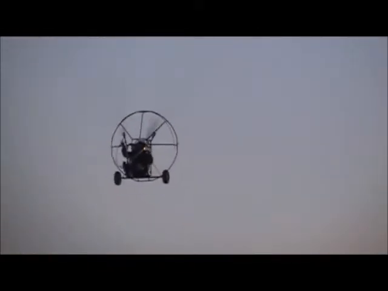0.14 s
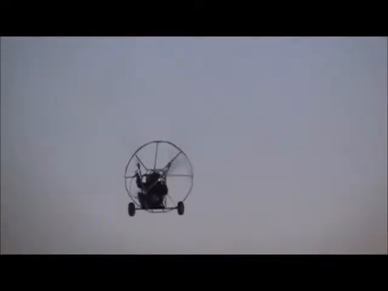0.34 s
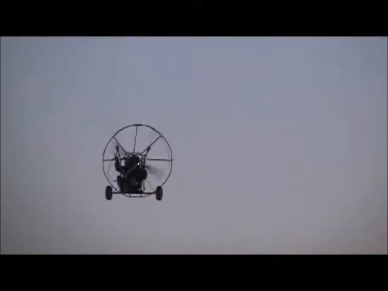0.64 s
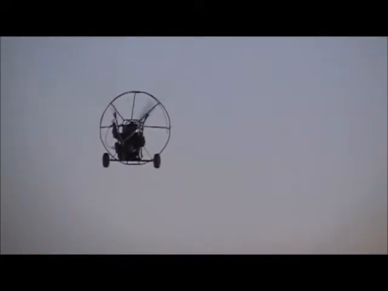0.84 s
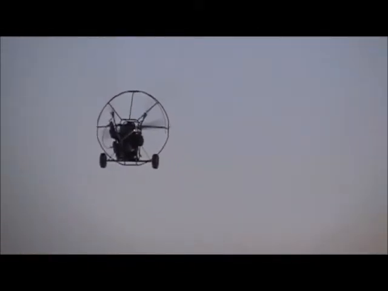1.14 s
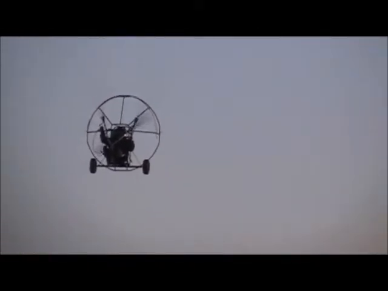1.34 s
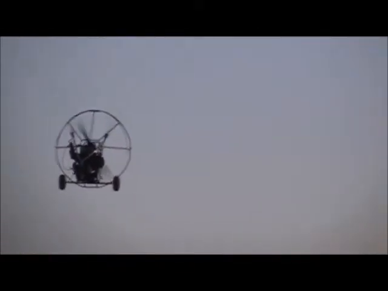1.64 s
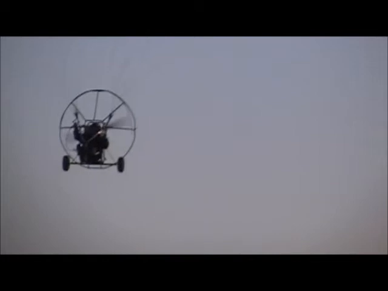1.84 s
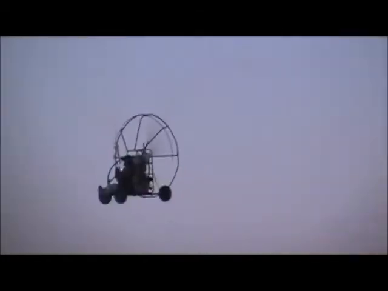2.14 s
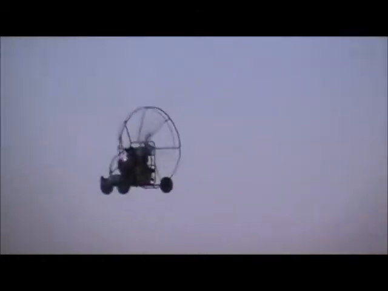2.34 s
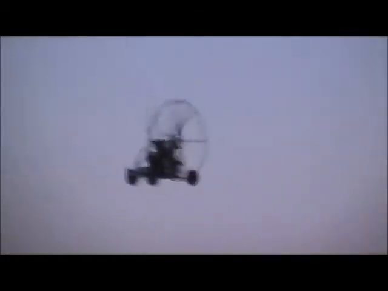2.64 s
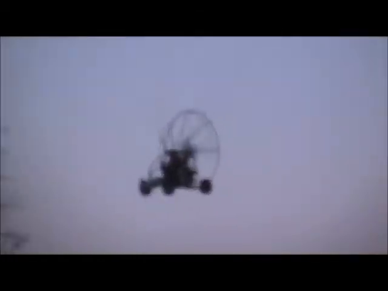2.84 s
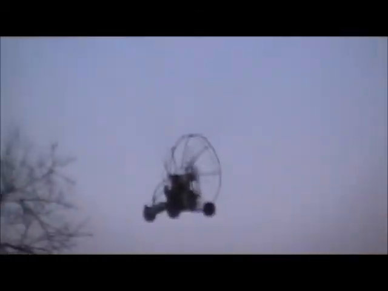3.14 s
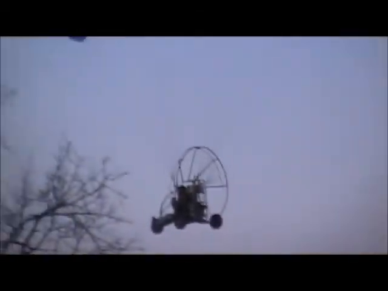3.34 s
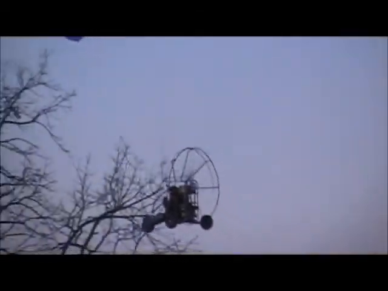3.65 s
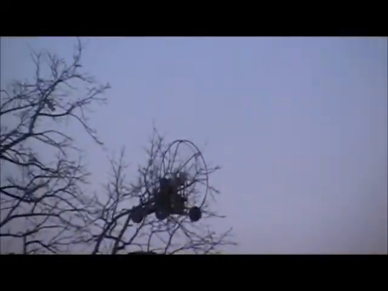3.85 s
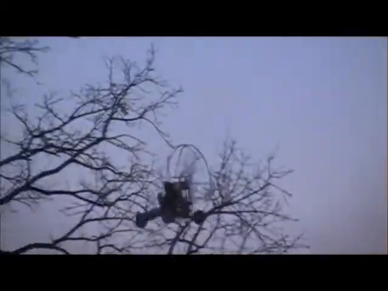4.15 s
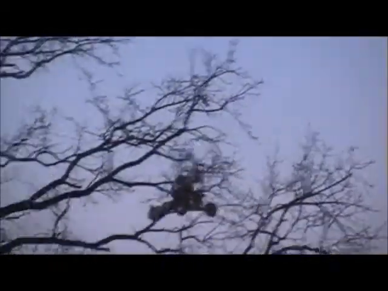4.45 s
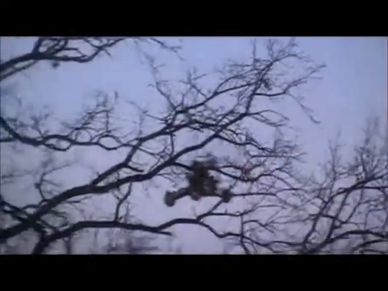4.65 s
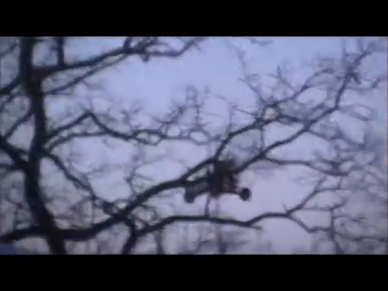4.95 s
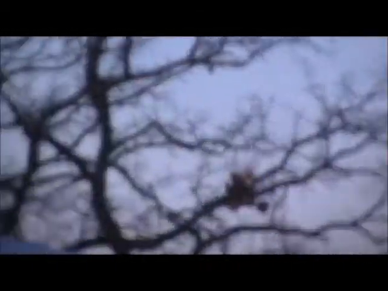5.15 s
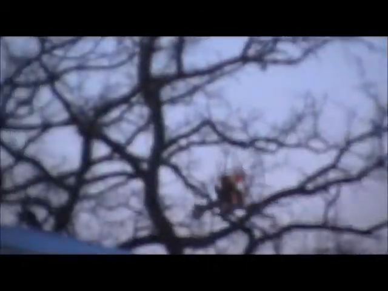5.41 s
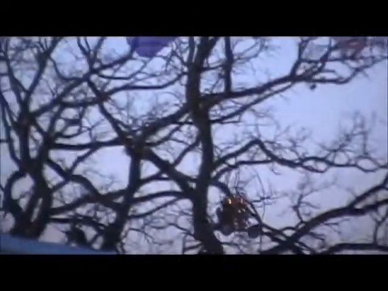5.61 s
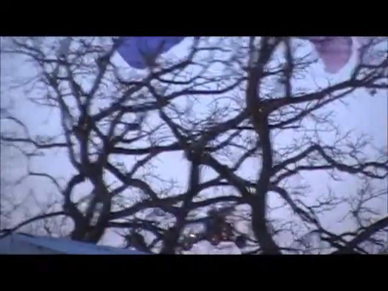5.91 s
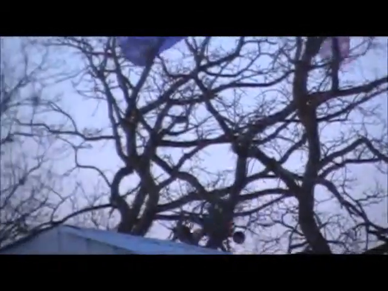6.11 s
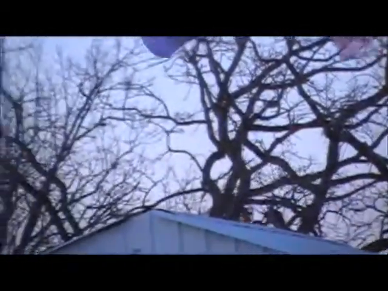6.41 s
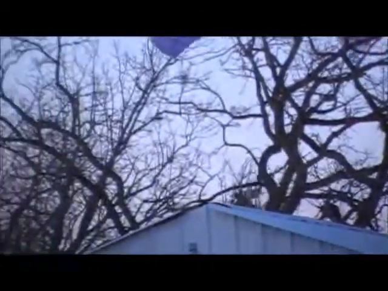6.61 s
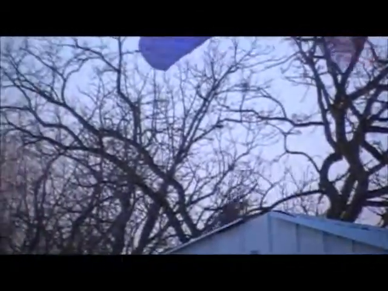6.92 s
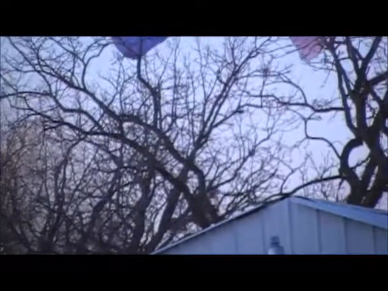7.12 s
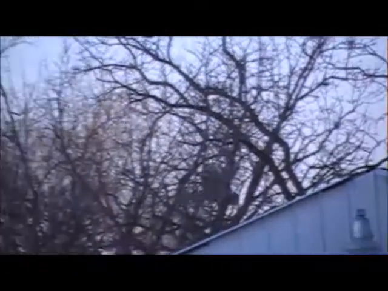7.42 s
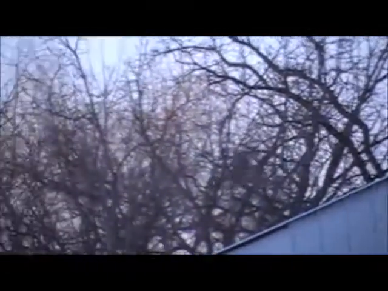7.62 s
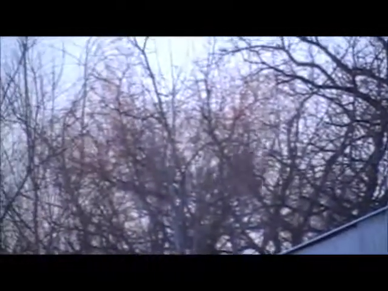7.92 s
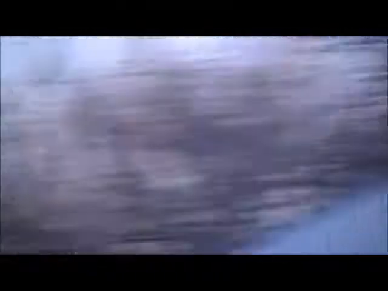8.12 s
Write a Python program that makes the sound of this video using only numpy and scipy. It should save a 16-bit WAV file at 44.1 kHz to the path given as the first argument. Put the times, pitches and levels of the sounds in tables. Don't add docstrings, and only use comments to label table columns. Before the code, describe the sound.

Outdoors, a small four-stroke engine and propeller drone in the distance, fluttering and airy, its pitch sliding down. Around two seconds finger touches and one violent, clipped button clack hit the handheld camera, briefly dipping the level. Abruptly the craft is closer, louder and higher pitched, with hard rapid blade slaps, slowly receding. Finger clicks come near the end over faint hiss.

```python
import sys
import numpy as np
from scipy import signal
from scipy.fft import rfft, irfft, next_fast_len
from scipy.io import wavfile
from scipy.ndimage import uniform_filter1d

SR = 44100
rng = np.random.default_rng(int(sys.argv[2]) if len(sys.argv) > 2 else 0)


def dump(signal):
    limited = np.clip(np.atleast_2d(signal).T, -1, 1)
    pcm = np.round(limited * 32767).astype(np.int16)
    wavfile.write(sys.argv[1], SR, pcm)


def convert_level_to_amplitude(level_db):
    exponent = np.asarray(level_db, float) / 20
    return 10 ** exponent


N = 364707
HZ = np.fft.rfftfreq(next_fast_len(N), 1 / SR)
CUT_S = 2.111
BUTTON_S = 2.041

# (time [s], level [dB], clearness of the view [dB])
FAR_VIEW = [(0.0, -40, -6.5), (0.65, -39, -3), (1.2, -40.5, -3.5), (1.959, -44.5, -0.5)]
NEAR_VIEW = [(2.112, -31, -2.5), (2.5, -31, 2.5), (3.14, -32.5, -1), (4.2, -32.5, 4), (5.201, -34, -2.5),
             (5.6, -36, -3), (6.799, -36, -7), (7.24, -37.5, -8.5), (7.6, -37, 2), (8.27, -36.5, -4.5)]
# (time [s], rate [Hz])
FAR_CYCLE_RATE = [(0.0, 22.45), (0.22, 22.1), (0.65, 21.43), (1.09, 20.6), (1.52, 18.55), (1.96, 16.72)]
NEAR_CYCLE_RATE = [(2.11, 29.1), (2.6, 28.95), (3.14, 29.065), (3.82, 29.025), (4.16, 28.8), (4.85, 28.49),
                   (5.53, 28.28), (6.22, 27.89), (6.56, 27.9), (6.9, 27.7), (7.24, 27.93), (8.27, 27.71)]
# (trim [dB], exhaust [dB], slap [dB], rush [dB], puff depth [0-1], valve tick depth [ratio])
FAR_BALANCE = (-1.12, -5, -22.5, -1, 0.6, 6)
NEAR_BALANCE = (-1.5, -3.5, 0.5, 3.5, 0, 1.1)
# (blade passes a cycle, starting blade phase [turns], puffs a cycle,
#  exhaust phase scatter [rad], waver [dB], phase drift a multiple [rad])
FAR_GEAR, NEAR_GEAR = (1.768, 0, 2, .6, 2.4, .03), (1.7501, .575, 1, 1.0, 2.4, .005)
FAR_SIGHT, NEAR_SIGHT = (0.41, 0.43, 0.05, 0.01), (-0.23, -0.024, 0.18, 0.76)
# (rattle [dB], treble rise [dB/s], top edge rise [dB/s])
FAR_TURN, NEAR_TURN = (-28, 0.7, 1), (-24, 0.099, 2.7)
# (level at the start [dB], fade [dB/s2])
FAR_WHIR, NEAR_WHIR = (-10, .5), (-6, 2)

# (multiple of the cycle rate, level [dB], extra before it turns away [dB])
FAR_PIPE = [(3, -46, 5), (4, -48, 0), (5, -31, -0.5), (7, -26, 4), (9, -27.5, 2), (11, -36, -5),
            (14, -39.5, 1.5)]
NEAR_PIPE = [(2.008, -44.5, 0.5), (3, -37, 7.5), (3.98, -45, 2), (5.05, -25, 5), (6, -27, 8.5),
             (7.92, -25.5, 8), (8.6, -42.5, -6.5), (11, -33.5, -0.5), (12.05, -30, 7.5), (12.97, -39.5, 8),
             (15, -18.5, 3.5), (16, -35.5, 3.5), (16.84, -28.5, -1), (18, -21, 6), (19, -25, -2.5),
             (20, -19, -3), (22, -18.5, 1.5), (23, -24, 7), (24, -27, 7), (25.16, -24, 12), (26, -20.5, 2),
             (27, -27.5, 3), (28.77, -25, -5), (30, -27, 10), (31, -29.5, 14.5), (32, -30.5, 12),
             (33, -27.5, 12), (34, -24, 11.5), (36, -27.5, 8.5), (37, -22, 5), (38, -29.5, 8.5),
             (39, -28.5, 14.5), (41.7, -32, 16.5)]
# (multiple of the blade rate, level [dB], extra before it turns away [dB])
PROPELLER = [(7.95, -37.5, 3), (9, -29, 3.5), (10, -30.5, -2), (11, -27, 2), (12, -18, 11),
             (15, -12.5, 3.5), (16, -12.5, 0.5), (17.9, -11, 5), (22, -15, 1), (26, -13.5, -2)]
PROPELLER_ODD_DB, PIPE_ODD_DB = -6.5, 1

# (frequency [Hz], level [dB], extra at first [dB])
SLAP_COLOUR = [(50, -55, 1), (174, -15, 2.5), (260, -29.5, 0.5), (350, -29, 1), (415, -14, 7),
               (455, -9.5, 2), (500, -10.5, -10.5), (560, -7.5, 0.5), (600, -6.5, 0.5), (650, -11, -4),
               (705, -9, -13), (755, -5, -10), (837, -3.5, -6), (852, -8.5, -6.5), (952, -12.5, -5.5),
               (1010, -14, -6), (1100, -19.5, 3.5), (1207, -34, -1), (1320, -21.5, -7), (1450, -24, -7.5),
               (1574, -9, 1.5), (1615, -4, 4), (1674, -7.5, 3.5), (1780, -14, 3), (1947, -31, 3),
               (2080, -26.5, 1), (2196, -39, -0.5), (12000, -125, -1)]
# (time [s], extra level [dB])
GUSTS = [(2.118, 4), (2.158, -2), (2.198, 1), (2.315, 5.5), (2.394, 0), (2.473, 1), (2.551, -1.5),
         (2.59, 5.5), (2.669, 5), (2.708, 4), (2.807, 3.5), (2.865, 6.5), (2.945, 7.5), (3.002, 4.5),
         (3.219, 5), (3.317, 3.5), (3.416, 2), (3.455, 5), (3.496, 3.5), (3.593, 0), (3.674, 1.5),
         (3.869, 2), (3.968, 3.5), (4.007, 5), (4.185, 3.5), (4.284, 4), (4.424, 4), (4.703, 1), (4.784, 1),
         (5.125, 2), (5.307, 2.5), (5.549, 3), (5.65, 1), (5.731, 3.5), (5.996, 5), (6.159, 4),
         (7.186, 2.5), (7.698, -0.5), (8.027, -2.5)]

# (frequency [Hz], density [dB per Hz])
FAR_RUSH = [(30, -58), (75, -45), (150, -27), (230, -29.5), (340, -29), (455, -13.5), (750, -12.5),
            (950, -16), (1130, -22), (1500, -12.5), (1950, -23.5), (2250, -21.5), (2750, -25.5),
            (3100, -24.5), (3400, -37.5), (3700, -50), (4300, -66), (5500, -85)]
# (frequency [Hz], density [dB per Hz], extra at first [dB])
NEAR_RUSH = [(29.9, -58.5, 0), (112, -36, 1), (170, -29.5, 2), (260, -34.5, -2.5), (425, -23, 1.5),
             (700, -13.5, -0.5), (1000, -15, -1), (1230, -18.5, -3), (1380, -14.5, -8.5), (1620, -13.5, 2),
             (1957, -20, 4.5), (2230, -23, -6), (2550, -19.5, 1.5), (2984, -21, 4.5), (3405, -22, -6),
             (3710, -27, -0.5), (4113, -38, -0.5), (4500, -45, -2.5), (5980, -81, -0.5)]
# (frequency [Hz], density [dB per Hz])
FAR_RATTLE = [(3500, -11.5), (4200, -9.5), (4900, -4.5), (5500, -6.5), (6200, 3), (6900, -0.5),
              (7600, -11.5), (8500, -14), (12000, -50)]
NEAR_RATTLE = [(3500, -7.5), (4500, 1), (5400, -2.5), (6100, -0.5), (6700, 0), (7600, -4), (8500, -13.5),
               (9500, -25.5), (12000, -50.5)]
# (time [s], width [s], level [dB])
SHADES = [
    (3.35, 0.15, 1.5),
    (5.785, 0.24, 4.5),
    (8.2, 0.16, 3),
    (6.79, 0.3, -6),
]

# (time [s], peak [dB], low modes [dB], high modes [dB], decay scale [ratio])
CLICKS = [(.5088, -19, -5, -27, .7), (1.9715, -34, 0, -24, 1.2), (1.978, -38, -3, -17, 1.6),
          (1.9835, -27, 9, -22, 1.6), (1.987, -9, -18, -36, 1.1), (1.993, -27, -8, -28, 1.0),
          (2.0052, -10, -2, -17, .85), (2.0424, -20, -6, -25, .7), (2.0452, -30, -6, -30, .9),
          (8.1695, -36, -8, -8, .9), (2.057, -48, -5, -12, .6), (8.0995, -25, -8, -15, .7),
          (8.1727, -8, -7, -22, 1.2), (8.1853, -16, -8, -26, .9), (2.0391, 15, -21, -8, .46)]
# (frequency [Hz], level [dB], t60 [s])
BODY_LOW = [(620, -5, 0.02), (781, 0, 0.02), (1194, 0, 0.016), (1640, -15, 0.02), (2060, -4, 0.02)]
BODY_MID = [(3020, 0, .011), (3500, -5, .006), (4300, -14, .005)]
BODY_HIGH = [(5000, -6, 0.005), (6200, 1, 0.008), (7300, 0, 0.005), (10400, -7, 0.0027),
             (13500, -10, .0025)]
# (frequency [Hz], level [dB])
PORTS = [(60, -6), (200, -5), (500, -9.5), (1000, -7), (1800, -7.5), (3300, -6), (4300, -2.5), (5900, 9.5),
         (7400, 17.5), (12000, -2.5)]

# (frequency [Hz], density [dB per Hz])
HISS = [(30, -2.5), (300, -4.5), (5000, 2), (10000, -0.5), (13000, -4), (15500, -10)]
# (left hiss level [dB rms], right hiss level [dB rms])
HISS_DB = [-77.5, -74]
# (frequency [Hz], level [dB rms])
WHINE = [(10110, -86), (15735, -96)]


def trike(pitch, view, sight, turn, orders, rush_colour, rattle_colour, balance, gear):
    t = np.arange(N) / SR
    view_s, level_db, clear_db = np.transpose(view)
    mean_db = level_db.mean()
    level_db, clear_db = np.interp(t, view_s, level_db), np.interp(t, view_s, clear_db)
    since, length = t - view_s[0], view_s[-1] - view_s[0]
    trim_db, exhaust_db, slap_db, rush_db, puff_depth, tick_depth = balance
    rattle_db, treble_rise, edge_rise, whir_db, whir_fade = turn

    cycle = np.cumsum(np.interp(t, *np.transpose(pitch))) / SR
    cycle = cycle - cycle[int(pitch[0][0] * SR)]
    blades = gear[0] * cycle + gear[1]
    cycle = cycle - .075 * np.clip(t - 4.5, 0, None)
    ticks = valve_ticks(cycle)

    body = convert_level_to_amplitude(exhaust_db) * exhaust(cycle, orders, since, length, *gear[3:])
    body = body + convert_level_to_amplitude(slap_db) * slaps(blades)
    rush = air_rush(blades, gear[2] * cycle, ticks, slap_db, puff_depth, rush_colour)
    body = body + convert_level_to_amplitude(rush_db) * rush

    bass = colour(body, 1 / (1 + (HZ / 300) ** 8))
    presence, treble, edge = (colour(body, 1 - 1 / (1 + (HZ / f) ** 8)) for f in (1250, 2100, 3700))
    middle = body - bass - presence
    midway = since - length / 2
    shade_db = sum(db * np.exp(-((t - at) / width) ** 2) for at, width, db in SHADES)
    treble_db = sight[2] * clear_db + shade_db + treble_rise * midway
    opened = treble + (convert_level_to_amplitude(edge_rise * midway) - 1) * edge
    treble_change = convert_level_to_amplitude(treble_db) * opened - treble
    presence_db = sight[1] * clear_db + sight[3] * (level_db - mean_db)
    heard = middle + convert_level_to_amplitude(sight[0] * clear_db) * bass + convert_level_to_amplitude(presence_db) * (presence + treble_change)

    rattle = convert_level_to_amplitude(rattle_db + clear_db) * valve_rattle(ticks, tick_depth, rattle_colour)
    whir = fan_whir(cycle, since, whir_db, whir_fade)
    return convert_level_to_amplitude(level_db + trim_db) * (heard / middle.std() + rattle + whir)


def exhaust(cycle, orders, since, length, scatter, waver_db, drift):
    on = (since > -.05) & (since < length + .2)
    waver = [walk(4.0)[on] for _ in range(6)]
    swell = [convert_level_to_amplitude(waver_db * w) for w in waver]
    facing = np.exp(-(since[on] / 1.5) ** 2)
    out = 0
    for k, (multiple, db, early_db) in enumerate(orders):
        phase = scatter * rng.standard_normal() + drift * multiple * waver[(k + 3) % 6]
        size = convert_level_to_amplitude(db) + (convert_level_to_amplitude(db + early_db) - convert_level_to_amplitude(db)) * facing
        out = out - size * swell[k % 6] * np.cos(2 * np.pi * multiple * cycle[on] + phase)
    tones = np.zeros(N)
    tones[on] = unit(out)
    return tones


def stack(table, odd_db, ratio=1):
    at, db, early_db = np.transpose(table)
    multiple = np.arange(round(at[0]), round(at[-1]) + 1)
    db = np.interp(multiple, at, db) + odd_db * (multiple % 2)
    return list(zip(ratio * multiple, db, np.interp(multiple, at, early_db)))


def slaps(blades):
    at = np.flatnonzero(np.diff(np.floor(blades)))
    chance = rng.standard_normal((N // 400, 2))[:len(at)]
    size_db = chance[:, 1].copy()
    for s, db in GUSTS:
        size_db[np.argmin(np.abs(at / SR - s))] = db + 0.5
    jitter = np.round(.8 * chance[:, 0]).astype(int)
    pulses = np.zeros(N)
    pulses[np.clip(at + jitter, 0, N - 1)] = convert_level_to_amplitude(size_db)
    return sliding(pulses, SLAP_COLOUR, 1.8, slap_response)


def slap_response(gain):
    sharpness, spread_s, spread_hz = 0.38, 0.0025, 1000
    cepstrum = irfft(np.log(gain), next_fast_len(N))
    cepstrum[1:len(HZ) - 1] *= 2
    cepstrum[len(HZ):] = 0
    low = np.minimum(HZ, spread_hz)
    trail = 2 * np.pi * spread_s * (low - low ** 2 / (2 * spread_hz))
    return gain * np.exp(1j * (sharpness * rfft(cepstrum).imag - trail))


def air_rush(blades, puffs, ticks, slap_db, puff_depth, rush_colour):
    gate = 1 + 0.5 * convert_level_to_amplitude(slap_db) * puff(blades + .08, .25)
    gate = gate + puff_depth * puff(puffs, .25) + 0.35 * ticks
    return sliding(gate * convert_level_to_amplitude(0.73 * walk(25.)) * rng.standard_normal(N), rush_colour, 2.4)


def puff(phase, width):
    return unit(np.exp(-(phase % 1) / width))


def valve_ticks(cycle):
    return puff(cycle + .15, 0.15) + .8 * puff(cycle - .24, 0.13)


def valve_rattle(ticks, depth, rattle_colour):
    flutter = convert_level_to_amplitude(2.3 * walk(30.) + 1.5 * walk(10.))
    return unit(colour((1 + depth * ticks) * flutter * rng.standard_normal(N), shape(rattle_colour)))


def fan_whir(cycle, since, start_db, fade):
    return convert_level_to_amplitude(start_db - fade * since ** 2 + 2.5 * walk(6.)) * np.sin(2 * np.pi * 40 * cycle)


def clicks():
    out, t = np.zeros((2, N + SR // 10)), np.arange(SR // 10) / SR
    for s, db, low_db, high_db, scale in CLICKS:
        clack = db > 0
        turn, left_db, rise_s = (2.1, -4, .0004) if clack else (1.6, -2.1, .0007)
        ring = 0
        for modes, group_db in ((BODY_LOW, low_db), (BODY_MID, 0), (BODY_HIGH, high_db)):
            for hz, mode_db, t60 in modes:
                hz = hz * (1 + .012 * rng.standard_normal())
                decay = np.log(1000) / (t60 * scale)
                ring = ring + convert_level_to_amplitude(group_db + mode_db) * np.exp((2j * np.pi * hz - decay) * t)
        crack = np.exp((2j * np.pi * 9500 - 5000 / scale ** .5) * t)
        ring = ring + convert_level_to_amplitude(high_db + 11) * crack
        grating = uniform_filter1d(uniform_filter1d(rng.standard_normal(len(t)), size=14), size=14)
        ring = ring * convert_level_to_amplitude(7.0 * grating)
        ring = ring * np.minimum(t / (rise_s * scale), 1) ** 2 * convert_level_to_amplitude(db)
        start = int(s * SR)
        out[:, start:start + len(t)] += np.imag([convert_level_to_amplitude(left_db) * ring, np.exp(-1j * turn) * ring])
    late = np.clip(np.arange(N) / SR - CLICKS[-1][0], 0, None)
    thump = convert_level_to_amplitude(-41) * np.sin(2 * np.pi * 55 * late) * np.exp(-late / 0.016)
    highpass = signal.butter(2, 330, "high", fs=SR, output="sos")
    return signal.sosfilt(highpass, out[:, :N]) + thump * [[1], [.7]]


def duck(t):
    s = BUTTON_S + np.cumsum([-0.08, 0.08, 0.009, 0.015, 0.045])
    return convert_level_to_amplitude(np.interp(t, s, [0, -2, -11, -11, -2]))


def ports(x):
    late = np.exp(-2j * np.pi * HZ * 4 / SR)
    left = shape(PORTS)
    right = 2 / np.abs(1 + left / late)
    scatter = np.exp(2j * np.pi * uniform_filter1d(rng.standard_normal(len(HZ)), size=40) * 7.4)
    spare = next_fast_len(N) - N
    fade = np.linspace(1, 0, spare)
    x = np.r_[x, fade * x[::-1][:spare] + (1 - fade) * x[:spare][::-1]]
    return colour(x, np.array([left * right * (1 + 0.2 * scatter), right * late]))


def preamp_hiss():
    return unit(colour(rng.standard_normal((2, N)), shape(HISS))) * convert_level_to_amplitude(np.array(HISS_DB))[:, None]


def electronic_whine(t):
    return sum(np.sqrt(2) * convert_level_to_amplitude(db) * np.sin(2 * np.pi * hz * t) for hz, db in WHINE)


def sliding(x, table, settle_s, response=np.abs):
    since = np.arange(N) / SR - CUT_S
    share = np.where(since < 0, .5, np.exp(-since / settle_s))
    first = [(hz, db + sum(extra)) for hz, db, *extra in table]
    last = [row[:2] for row in table]
    gains = np.array([response(shape(first, 1.03)), response(shape(last, 1 / 1.03))])
    high, low = colour(x, gains)
    return unit(share * high + (1 - share) * low)


def shape(table, stretch=1):
    hz, db = np.transpose(table)
    return convert_level_to_amplitude(np.interp(np.log(HZ + 1), np.log(hz * stretch), db))


def colour(x, gain):
    return irfft(rfft(x, next_fast_len(N)) * gain, next_fast_len(N))[..., :N]


def unit(x):
    return x / np.sqrt(np.mean(x ** 2))


def walk(rate):
    k = int(SR / rate)
    held = np.repeat(rng.standard_normal(N // k + 1), k)
    return uniform_filter1d(uniform_filter1d(held, k), k)[:N]


def scene():
    t = np.arange(N) / SR
    front = stack(FAR_PIPE, PIPE_ODD_DB) + stack(PROPELLER, PROPELLER_ODD_DB, FAR_GEAR[0])
    far = trike(FAR_CYCLE_RATE, FAR_VIEW, FAR_SIGHT, FAR_TURN + FAR_WHIR, front,
                FAR_RUSH, FAR_RATTLE, FAR_BALANCE, FAR_GEAR) * duck(t)
    rear = [tone for tone in stack(NEAR_PIPE, PIPE_ODD_DB) if tone[0] % 7]
    near = trike(NEAR_CYCLE_RATE, NEAR_VIEW, NEAR_SIGHT, NEAR_TURN + NEAR_WHIR, rear,
                 NEAR_RUSH, NEAR_RATTLE, NEAR_BALANCE, NEAR_GEAR)
    change = np.clip((t - CUT_S) / .0006, 0, 1)
    return ports(far + change * (near - far)) + clicks()


def band_limit(x):
    return signal.sosfilt(signal.butter(12, 15750, fs=SR, output="sos"), x)


def record(dry):
    t = np.arange(N) / SR
    overloaded = np.clip(dry + preamp_hiss() + electronic_whine(t), -.97, .97)
    ended = overloaded * np.minimum((t[-1] - t) / .0015, 1)
    mix = signal.sosfilt(signal.butter(2, 14000, fs=SR, output="sos"), ended)
    return band_limit(mix)


dry = scene()
out = record(dry)
dump(out)
```